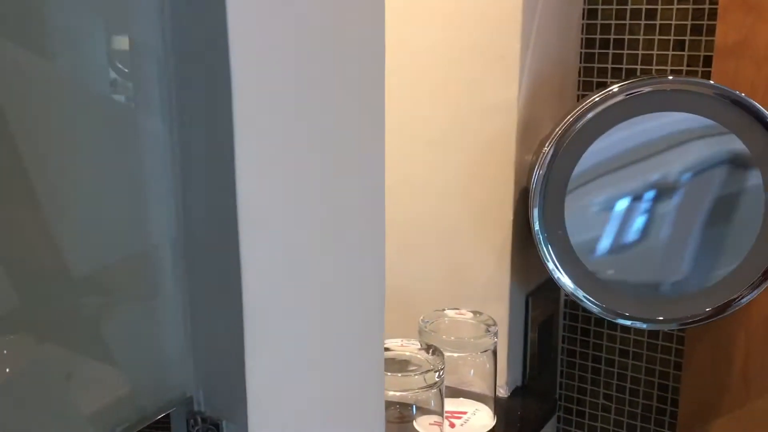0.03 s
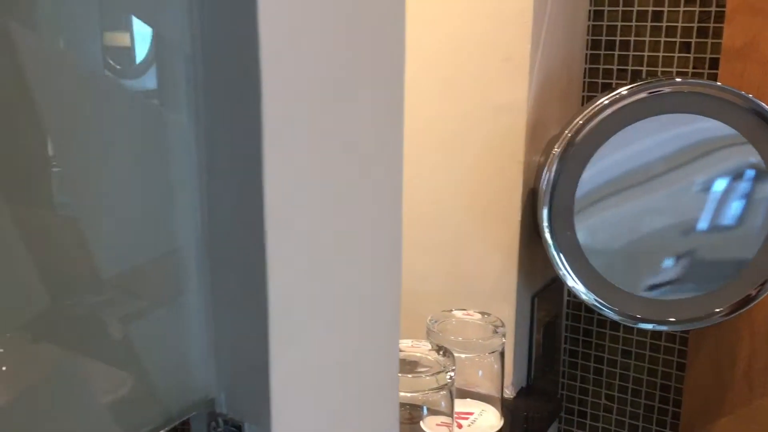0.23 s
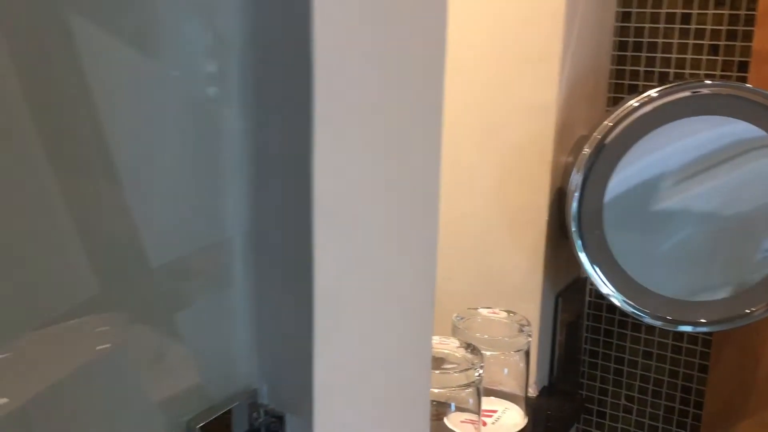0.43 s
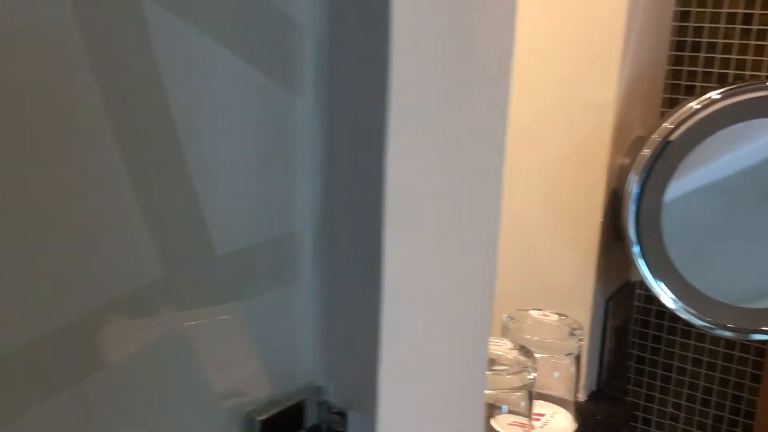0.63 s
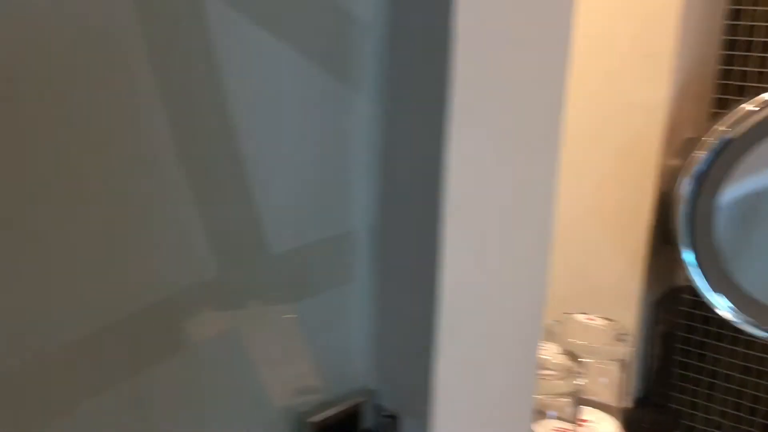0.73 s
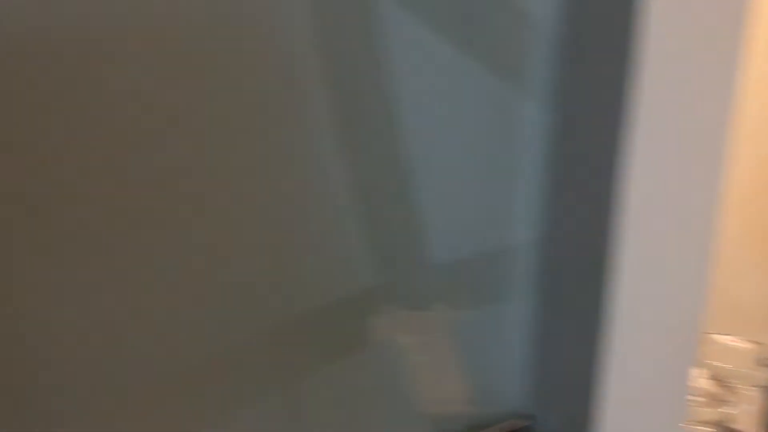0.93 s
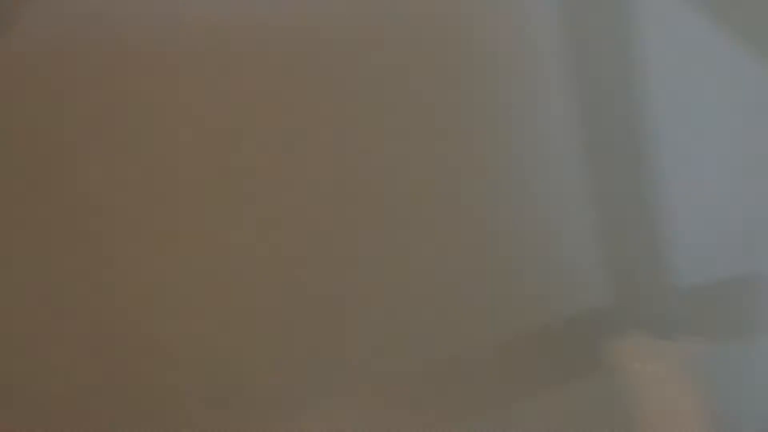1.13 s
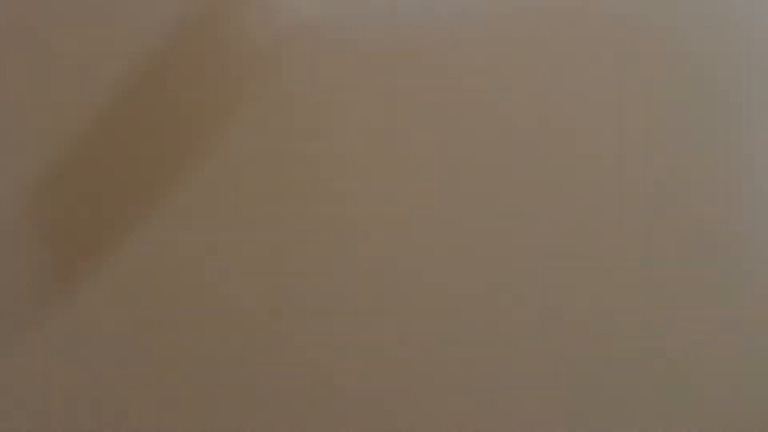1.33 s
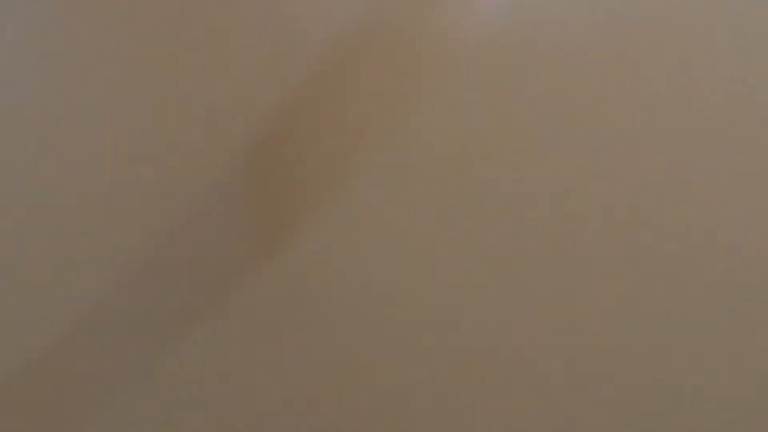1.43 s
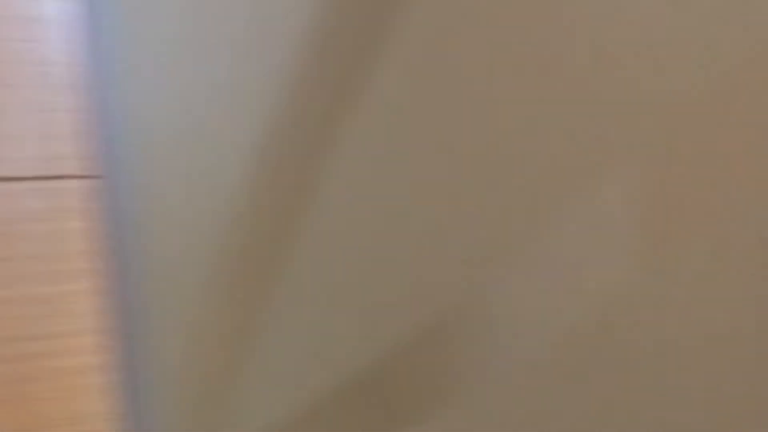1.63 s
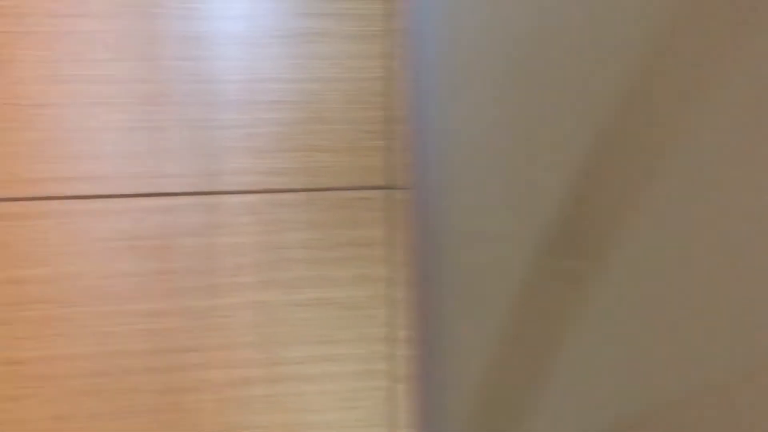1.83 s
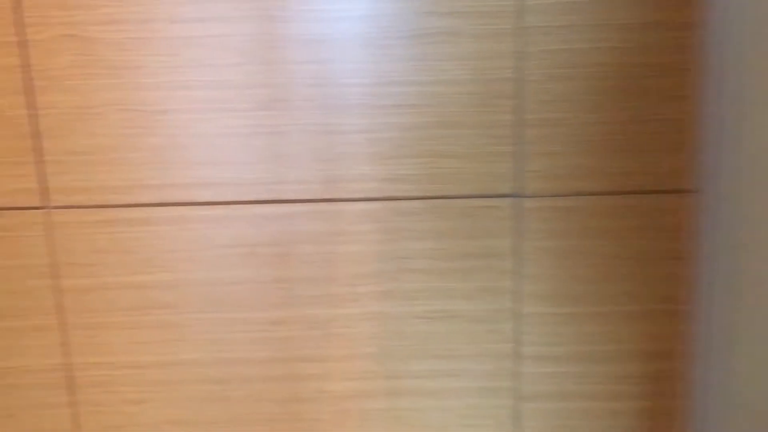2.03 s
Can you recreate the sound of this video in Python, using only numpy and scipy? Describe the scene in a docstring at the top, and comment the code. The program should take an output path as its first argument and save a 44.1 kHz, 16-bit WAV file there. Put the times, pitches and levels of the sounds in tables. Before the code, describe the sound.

A sliding door unlatches with a thump, then rolls along its track, ticking.

```python
"""Ventilation hums in a small tiled bathroom, and a hand rustles at a sliding panel that drones faintly.
The catch clicks open, the panel knocks against its frame, and a thump sets it ringing and booming.
Then it rolls along its track: the rollers rub and tick, faster as it gathers speed and slower as it
stops, and the rail rings more brightly towards the end. A last rustle and a dull bump follow."""
import sys
import numpy as np
from scipy import signal
from scipy.fft import rfft, irfft, next_fast_len
from scipy.io import wavfile

SR = 44100
rng = np.random.default_rng(int(sys.argv[2]) if len(sys.argv) > 2 else 0)


def inscribe(sig):
    """Save sig as 16-bit PCM at rate SR to the path in sys.argv[1].

    A 1-D sig is mono; a 2-D sig holds one channel per row.
    Samples are clipped to [-1, 1] before scaling.
    """
    pcm = np.round(np.clip(np.atleast_2d(sig).T, -1, 1) * 32767)
    wavfile.write(sys.argv[1], SR, pcm.astype(np.int16))


N = 92610
TIME = np.arange(N) / SR

# how long the room's echo takes to fade by 60 dB (its "t60"): f/Hz, t60/s
ROOM_FADE = [(80, 0.79), (300, 1), (1500, 0.77), (5500, 0.57), (9000, 0.41), (15000, .27)]
# tone colour of the ventilation, or how strong each pitch is: f/Hz, level/dB
VENT_COLOUR = [(25, -23.5), (50, 9), (90, 3), (150, -3), (220, 4), (300, -2.5), (500, -12), (1500, -15.5),
               (3000, -26), (8000, -32), (15000, -44)]
# rustle of the hand: t/s, level/dB
RUSTLE_LEVEL = [(0, -57), (.08, -58), (.13, -47), (.19, -53), (.25, -49.5), (.32, -49), (.4, -87),
                (1.99, -62), (2.03, -51), (2.1, -51)]
# colour of the rustle: f/Hz, level/dB
RUSTLE_COLOUR = [(50, 9), (200, 5.5), (450, 7), (1600, -1.5), (3000, -7), (6500, -10), (10000, -15),
                 (15000, -22)]
# low drone of the panel: t/s, level/dB
DRONE_LEVEL = [(0, -48), (.68, -42), (.8, -37), (.86, -44), (.92, -39), (1.1, -42.5), (1.5, -45.5),
               (1.95, -46.5), (2.1, -63)]
# bumps of the frame: t/s, level/dB
FRAME_BUMPS = [(0.111, -44), (0.206, -28.5), (0.318, -26), (2.039, -31)]
# clicks of the catch: t/s, level/dB, decay/s
CATCH_CLICKS = [(0.1992, -27, .001), (.2405, -29, 0.0022), (0.336, -21, 0.0044), (.4205, -35, .001),
                (.5992, -29, .0004)]
# knocks of the panel and catch: t/s, relative level/dB, bass/dB, treble/dB
KNOCKS = [(0.2, -16, 7, 14), (.240, -14.5, 8, -7), (0.276, -16.5, 3.5, -8), (0.3398, -5, -3, 3.5),
          (.347, -2, 2.5, -21), (.382, -15, 13.5, 15.5), (.421, -17, 19, 13), (.479, -14.5, -6, -8)]
# colour of a knock: f/Hz, level/dB
KNOCK_COLOUR = [(40, -9), (80, 12), (220, 8.5), (310, -2), (520, -7.5), (700, 0), (950, -2), (1400, 1.5),
                (1850, -2), (2700, -15), (5500, -19.5), (8000, -27), (11000, -33.5), (15000, -40)]
# the panel's natural tones: f/Hz, level/dB, t60/s
PANEL_TONES = [(69.85, -25.5, 0.87), (107.6, -31, 0.93), (147.4, -35, 0.64), (194, -26, 0.24),
               (205.2, -30.5, 0.71), (234.8, -31, 0.56), (269, -48, .6), (387, -46, 1), (1550, -51, 0.46),
               (1574, -49, 1)]
# the panel's deepest swing: t/s, f/Hz, level/dB
BOOM = [(.35, 62.41, -65), (.39, 59.3, -29), (.45, 52.8, -26), (.475, 51, -31), (.51, 51.5, -24.5),
        (.61, 57, -24.5), (.66, 53.64, -28.5), (.685, 49.4, -39), (.76, 55.1, -34.5), (.86, 55, -57)]
# rub of the rollers on the track: t/s, relative level/dB
RUB_LEVEL = [(.76, -84), (.8, -45), (.9, -46.5), (1.05, -43.5), (1.3, -40.5), (1.42, -41), (1.5, -41.5),
             (1.62, -33), (1.72, -35), (1.81, -34.5), (1.87, -61.5), (1.95, -58.5)]
# separate ticks of the rollers: t/s, relative level/dB
TICKS = [(.781, -9), (.807, -17), (.835, -6), (.874, -2.5), (.910, -3), (.942, -1), (.981, -3.5), (.986, 0),
         (1.015, 0.5), (1.027, -2.5), (1.052, -3.5), (1.068, 2.5), (1.086, -8), (1.109, 2), (1.152, -9),
         (1.168, -2), (1.188, -2), (1.412, -10), (1.435, -2.5), (1.457, -3), (1.478, -2), (1.502, 1.5),
         (1.525, 1.5), (1.5485, 3), (1.5745, 5), (1.6028, 5.5), (1.6345, 3.5), (1.669, 5.5), (1.7062, 5.5),
         (1.741, 4), (1.783, -1.5)]
# ticks running together at full speed: t/s, rate/(ticks per s), relative level/dB
RATTLE = [(1.21, 80.4, -9), (1.28, 85, 0), (1.35, 105, -1.5), (1.40, 86, -4.5)]
# blend of the track's colours: t/s, place (0 = start, 1 = end)
TRACK_BLEND = [(1.12, 0), (1.31, 0.48), (1.40, 0.7), (1.53, 1)]
# colour of the track at its start, middle and end: f/Hz, level/dB
TRACK_START = [(100, -1.5), (300, 4.5), (580, 0), (690, 11.5), (1100, 5), (2000, 5), (3000, 0.5),
               (4400, -1.5), (5000, -8), (5800, 0), (6700, -12.5), (8300, -16.5), (9300, -13.5),
               (10500, -25), (14500, -25.5)]
TRACK_MIDDLE = [(100, -2), (550, -1), (730, 3), (1500, 6.5), (2100, -5), (2800, -4.5), (4400, -4.5),
                (4900, -1.5), (5400, 2), (6100, -5.5), (6700, -5.5), (8000, -15), (9200, -11.5),
                (10300, -25.5), (12000, -24.5), (15000, -32)]
TRACK_END = [(100, -8), (700, -10.5), (1150, -4.5), (1550, 4.5), (2150, 2.5), (2750, -6.5), (4450, -3.5),
             (4900, -3.5), (5300, 8), (6000, 1), (6600, -14.5), (7150, -7.5), (8100, -26.5), (9400, -16.5),
             (10200, -37), (11300, -18), (12300, -30), (15000, -28)]

CUTOFF_HZ = 15900


def from_db(db):
    """Turn decibels into a number to multiply by."""
    return 10 ** (np.asarray(db) / 20)


def unit_power(x):
    """Scale a sound to an average power of 1."""
    return x / np.sqrt(np.mean(x ** 2) + 1e-20)


def in_time(rows):
    """Join a table's points with lines: one curve for each column after the time."""
    times, *columns = np.transpose(rows)
    return [np.interp(TIME, times, column) for column in columns]


def at_hz(points, hz):
    """Look up a table by pitch, with octaves evenly spaced."""
    table_hz, values = np.transpose(points)
    return np.interp(np.log(np.maximum(hz, 1)), np.log(table_hz), values)


def keep_band(x, hz, kind):
    """Let the "low", "high" or "band" part of a sound through."""
    return signal.sosfilt(signal.butter(2, hz, kind, fs=SR, output="sos"), x)


def colour(x, spectrum):
    """Give a sound a tone colour by making some pitches stronger and others weaker."""
    size = 2 * next_fast_len(N // 2 + SR // 10)
    gains = from_db(at_hz(spectrum, np.fft.rfftfreq(size, 1 / SR)))
    cepstrum = irfft(np.log(gains))
    # this fold makes the filter ring after a hit, never before it
    cepstrum[1:size // 2] *= 2
    cepstrum[size // 2 + 1:] = 0
    return irfft(rfft(x, size) * np.exp(rfft(cepstrum)))[:N]


def drift(rate_hz):
    """A slow random wobble, about 1 in size."""
    return unit_power(keep_band(rng.standard_normal(2 * N), rate_hz, "low")[N:])


def grains(per_s=5000, spread_db=1.5):
    """Rubbing makes a stream of tiny clicks of uneven size."""
    sizes = from_db(spread_db * np.minimum(rng.exponential(1, N), 4))
    signs = rng.choice([-1, 1], N)
    return unit_power(sizes * signs * (rng.random(N) < per_s / SR))


def ring(start_s, hz, db, t60, attack_s=0.01):
    """One tone of a struck object: it swells quickly, then dies away."""
    age = np.maximum(TIME - start_s, 0)
    envelope = np.exp(-np.log(1000) * age / t60) * (1 - np.exp(-age / attack_s))
    return from_db(db) * envelope * np.sin(2 * np.pi * hz * age)


def contacts(rows, decay_s, attack_s=0.00046):
    """Hard parts meet: one short gritty burst for each row of t/s, level/dB."""
    out, age = np.zeros(N + SR), TIME[:SR // 20]
    envelope = np.exp(-age / decay_s) * (1 - np.exp(-age / attack_s))
    for s, db in rows:
        burst = rng.choice([-1, 1], len(age)) * envelope
        start = int(s * SR)
        out[start:start + len(age)] += from_db(db) * burst / np.linalg.norm(burst)
    return out[:N]


def room_tail(delay_s=0.003):
    """Dense echoes off the tiles, the highest fading first; each spot in the room has its own."""
    size = SR // 2
    age, hz = TIME[:size], np.fft.rfftfreq(size, 1 / SR)
    noise_spectrum = rfft(rng.standard_normal(size))
    edges_hz, tail = np.r_[0, np.geomspace(150, 20000, 10)], 0
    for low, high in zip(edges_hz, edges_hz[1:]):
        band = irfft(noise_spectrum * ((hz >= low) & (hz < high)))
        band *= np.exp(-np.log(1000) * age / at_hz(ROOM_FADE, (low + high) / 2))
        tail += band / np.linalg.norm(band) * np.sqrt(2 * (high - low) / SR)
    return np.concatenate([np.zeros(int(delay_s * SR)), tail])


def in_room(x, tail, echo_db):
    """Add the room's echo to a sound, keeping about the same power."""
    echo_gain = from_db(echo_db)
    return (x + echo_gain * signal.fftconvolve(x, tail)[:N]) / np.hypot(1, echo_gain)


def ventilation():
    """Moving air makes a steady low rush."""
    return from_db(-50) * unit_power(colour(rng.standard_normal(N), VENT_COLOUR))


def hand_rustle(tail):
    """A hand rubs softly on the panel before and after the slide."""
    rubbing = unit_power(colour(grains(), RUSTLE_COLOUR))
    return in_room(from_db(in_time(RUSTLE_LEVEL)[0]) * rubbing, tail, echo_db=-15.5)


def panel_drone(centre_hz=41, wander_hz=2.28, waver_db=1.5):
    """The panel gives a deep, unsteady tone, loudest as it starts to roll."""
    hz = centre_hz + wander_hz * drift(rate_hz=6)
    db = in_time(DRONE_LEVEL)[0] + waver_db * drift(rate_hz=10.7)
    return from_db(db) * np.sin(2 * np.pi * np.cumsum(hz) / SR)


def frame_bumps():
    """Each bump makes the frame ring briefly with one dull tone."""
    return sum(ring(s, hz=196, db=db, t60=0.13) for s, db in FRAME_BUMPS)


def catch_clicks(tail, lowest_hz=8800):
    """The metal catch makes tiny bright clicks."""
    clicks = 0
    for s, db, decay_s in CATCH_CLICKS:
        click = keep_band(contacts([(s, 0)], decay_s), [lowest_hz, CUTOFF_HZ], "band")
        clicks += from_db(db) * click / np.linalg.norm(click)
    return in_room(clicks, tail, echo_db=-3.5)


def catch_ping():
    """The catch rings as it is released, at the first knock."""
    return ring(KNOCKS[0][0], hz=9480, db=-51, t60=0.14, attack_s=0.00059)


def knocks(tail, boost_db=11.5, bass_hz=300, treble_hz=4000):
    """The panel and catch knock on the frame, each hit with its own bass and treble."""
    force = 0
    for s, db, bass_db, treble_db in KNOCKS:
        hit = contacts([(s, db + boost_db)], decay_s=0.0041)
        bass, treble = keep_band(hit, bass_hz, "low"), keep_band(hit, treble_hz, "high")
        middle = keep_band(keep_band(hit, bass_hz, "high"), treble_hz, "low")
        # the middle is flipped so the bands do not cancel where they meet
        force += from_db(bass_db) * bass - middle + from_db(treble_db) * treble
    return in_room(colour(force, KNOCK_COLOUR), tail, echo_db=2)


def panel_thump(start_s=0.343, swell_s=0.0244):
    """A thump sets the panel ringing, over a deep boom that slides in pitch."""
    tones = sum(ring(start_s, hz, db, t60) for hz, db, t60 in PANEL_TONES)
    boom_hz, boom_db = in_time(BOOM)
    fade_in = np.clip((TIME - start_s) / swell_s, 0, 1)
    boom = from_db(boom_db) * np.sin(2 * np.pi * np.cumsum(boom_hz) / SR)
    return tones + fade_in * boom


def rolling_rumble(band_hz=(68, 83)):
    """Rolling stirs a low rumble in the panel."""
    rumble = unit_power(keep_band(rng.standard_normal(N), band_hz, "band"))
    rolling = 1.0 * (TIME > RUB_LEVEL[0][0]) * (TIME < RUB_LEVEL[-1][0])
    envelope = keep_band(rolling, 18, "low")  # softens the start and stop
    return from_db(-54) * envelope * rumble


def rollers():
    """The rollers rub and tick, ringing a track whose colour changes along the way."""
    rub = from_db(in_time(RUB_LEVEL)[0]) * grains()
    ticks = from_db(-6) * contacts(TICKS + roller_rattle(), decay_s=0.0033)
    ticks = colour(ticks, [(1500, -6.5), (5000, 1.5), (11000, 5)])  # a sharper edge: f/Hz, level/dB
    place, out = in_time(TRACK_BLEND)[0], 0
    # the end of the track is nearest, so its ticks have less echo
    spots = [(0, TRACK_START, 2.5), (0.5, TRACK_MIDDLE, 2.5), (1, TRACK_END, -0.5)]
    for spot, spectrum, tick_echo_db in spots:
        share = np.sqrt(np.maximum(1 - 2 * abs(place - spot), 0))
        ticks_here = in_room(share * ticks, room_tail(), tick_echo_db)
        rub_here = in_room(share * rub, room_tail(), echo_db=-0.5)
        out += colour(ticks_here + rub_here, spectrum)
    return out


def roller_rattle(jitter_s=0.00093, spread_db=3):
    """At full speed the ticks come quickly and a little unevenly: rows of t/s, level/dB."""
    rate, db = in_time(RATTLE)
    rattling = (TIME > RATTLE[0][0]) * (TIME < RATTLE[-1][0])
    tick_count = np.ceil(np.cumsum(rate * rattling) / SR)
    starts = np.flatnonzero(np.diff(tick_count))
    chance = rng.standard_normal((64, 2))[:len(starts)]
    times = TIME[starts] + jitter_s * chance[:, 0]
    levels = db[starts] + spread_db * chance[:, 1]
    return list(zip(times, levels))


def scene():
    """Add all the sounds together in one channel."""
    tail = room_tail()
    mix = ventilation() + hand_rustle(tail) + panel_drone() + frame_bumps()
    mix += catch_clicks(tail) + catch_ping() + knocks(tail) + panel_thump()
    mix += rolling_rumble() + rollers()
    return mix[None]


def record(dry):
    """The microphone drops the deepest bass and the highest treble."""
    treble_cut = signal.ellip(10, 0.1, 70, CUTOFF_HZ, fs=SR, output="sos")
    return signal.sosfilt(treble_cut, keep_band(dry, 25, "high"))


dry = scene()
out = record(dry)
inscribe(out)
```